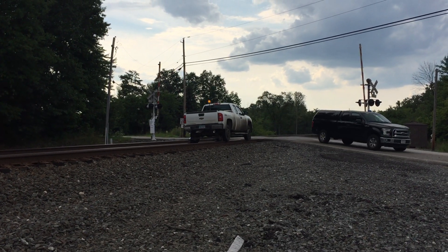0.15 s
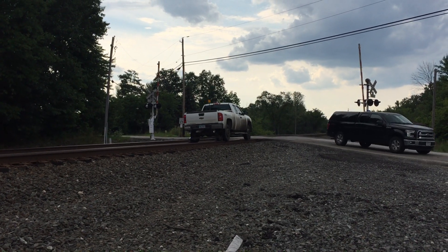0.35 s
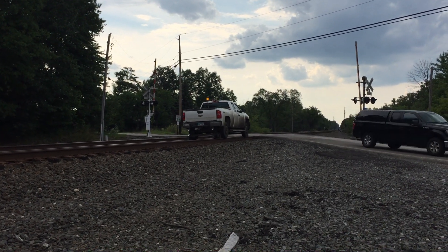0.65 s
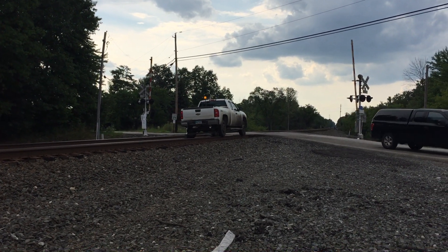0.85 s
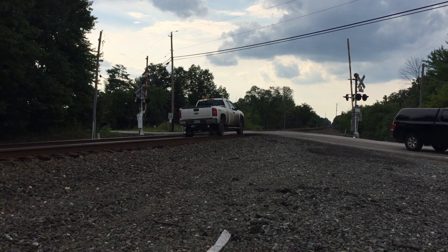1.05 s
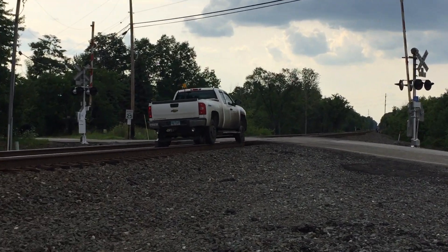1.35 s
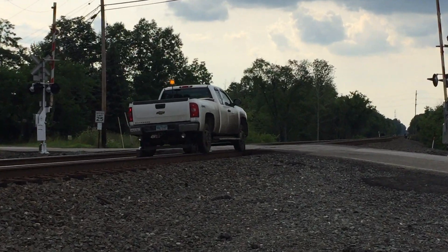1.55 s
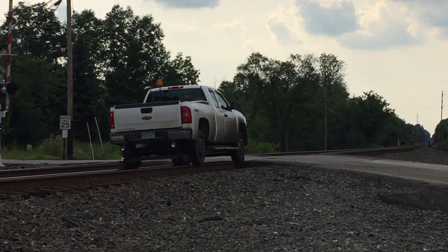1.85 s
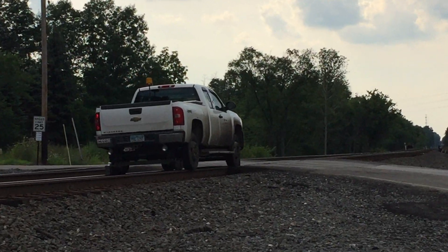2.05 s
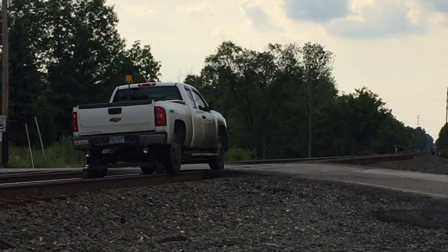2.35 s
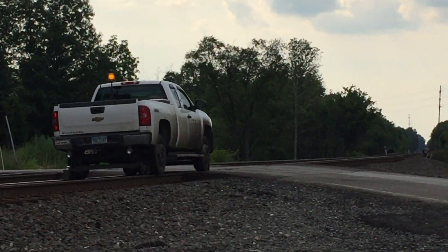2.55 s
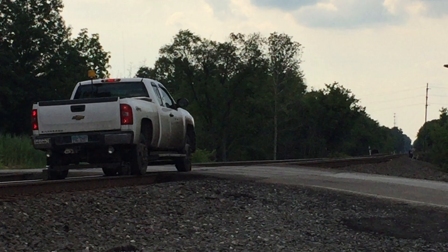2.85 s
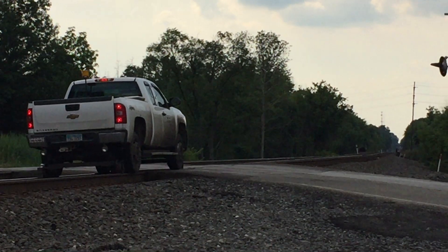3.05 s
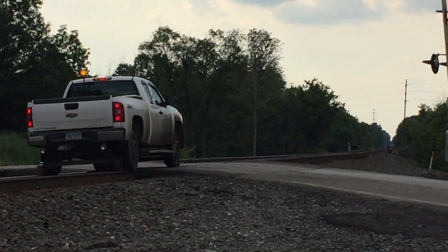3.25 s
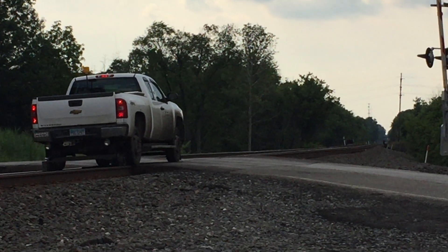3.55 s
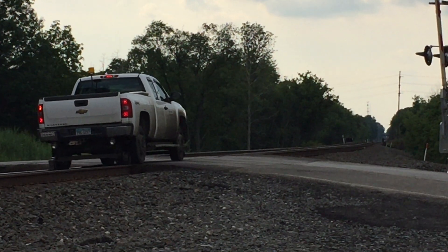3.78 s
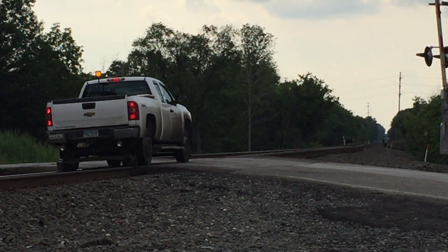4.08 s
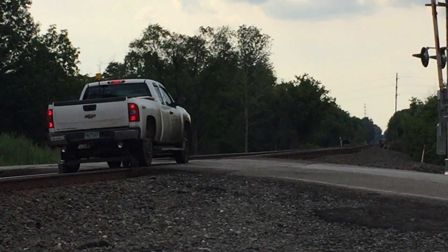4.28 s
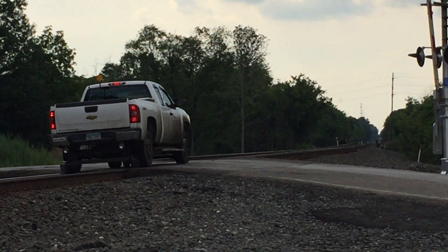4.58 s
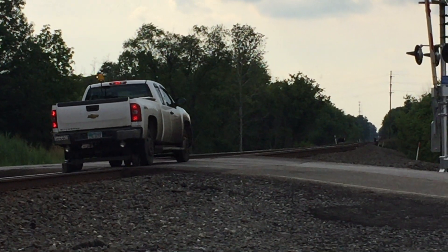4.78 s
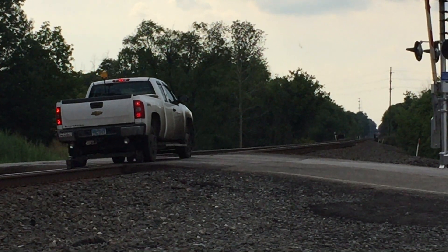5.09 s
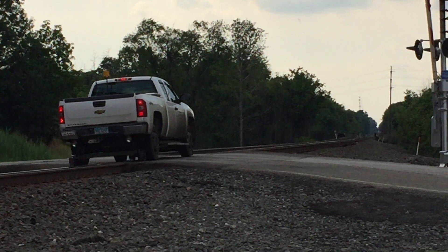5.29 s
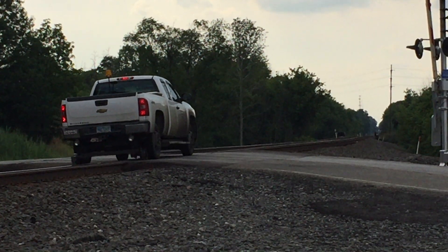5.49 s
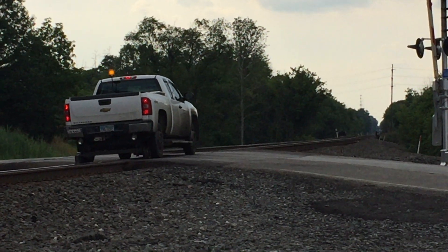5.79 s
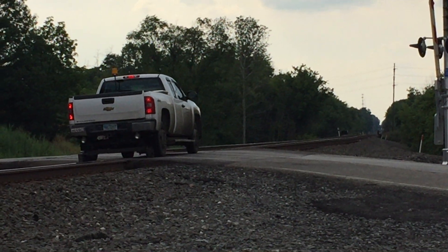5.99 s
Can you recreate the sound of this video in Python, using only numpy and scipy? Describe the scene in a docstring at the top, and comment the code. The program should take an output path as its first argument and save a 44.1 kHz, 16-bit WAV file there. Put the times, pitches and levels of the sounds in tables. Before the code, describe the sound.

Low throbbing engines and gravelly tyre hiss swell then fade outdoors, over a fast shrill insect trill, with squeaks, snaps and faint brake creaks.

```python
"""A pickup's exhaust leads: firing orders beat with other engine tones over throbbing low-band noise.
It creeps onto a railway crossing and brakes to a stop, while a second vehicle rolls off it and away.
Tyres are banded noise, brightest with the second vehicle near; brakes, pump and body panel add tones.
Dry squeaks, short bursts, chirps and sharp snaps, quicken into a chatter; the truck creaks.
An insect, one tone swept at each wing beat, ticks in the verge with a brief hush. Open air, mono."""
import sys
import numpy as np
from scipy import signal
from scipy.fft import rfft, irfft, next_fast_len
from scipy.io import wavfile
from scipy.ndimage import uniform_filter1d, map_coordinates

SR = 44100
rng = np.random.default_rng(int(sys.argv[2]) if len(sys.argv) > 2 else 0)


def transcribe(signal):
    """Save signal, clipped to [-1, 1], as a 16-bit WAV file at the path in sys.argv[1]."""
    frames = np.atleast_2d(signal).T
    limited = np.clip(frames, -1, 1)
    pcm = np.round(limited * 32767).astype(np.int16)
    wavfile.write(sys.argv[1], SR, pcm)


N = 270288  # samples

# Table levels are those before each layer's own trim, random wobble and filtering.
# the pickup's exhaust note: (time [s], firing rate [Hz], level [dB], octave level [dB])
EXHAUST_NOTE = [(0, 59.1, -54, -47), (0.25, 61.8, -47.5, -72), (0.6, 65.14, -42, -53),
                (1.1, 67, -44.5, -50.5), (1.3, 63.2, -68, -63), (1.5, 57.62, -45, -56.5),
                (1.95, 58.6, -42, -44.5), (2.5, 62.02, -39.5, -59.5), (3.3, 64.58, -47, -48),
                (4, 66.88, -42, -50), (5, 70, -43, -73), (5.55, 70.35, -51.5, -56.5),
                (6.13, 60.4, -51.5, -63)]
# third order against the first; it fades as the tailpipe turns away
THIRD_ORDER_DB, THIRD_FADE_DB_PER_S = -8, 3
# engine hum: (time [s], pitch [Hz], level [dB], octave level [dB])
ENGINE_HUM = [(1.3, 102.5, -62, -69), (1.8, 102.2, -52.5, -66), (2.3, 100.1, -60, -48),
              (3.3, 102.5, -51, -75), (4.4, 100.1, -86, -53), (4.9, 101.8, -81, -74),
              (5.3, 103.2, -58.5, -58.5), (5.7, 101.3, -56.5, -64), (6.13, 100.7, -56.5, -68)]
# a second exhaust note: (time [s], pitch [Hz], level [dB])
SECOND_EXHAUST = [(2.7, 50.13, -60), (3.0, 49.94, -52), (3.4, 54.55, -52), (3.9, 58.3, -53),
                  (4.2, 58.66, -51), (4.5, 59.57, -60), (4.9, 58.7, -47), (5.2, 59.8, -49.5),
                  (5.35, 60.4, -51)]
# an engine picks up: (time [s], pitch [Hz], level [dB])
ENGINE_PICKUP = [(0.1, 90.9, -62), (0.3, 96, -44), (0.5, 103.7, -43.5), (0.7, 119.5, -48),
                 (1.0, 130.1, -46.5), (1.3, 133.6, -67)]
# an engine eases off: (time [s], pitch [Hz], level [dB])
ENGINE_EASING = [(3.5, 111.9, -53), (3.9, 107, -52), (4.2, 100.6, -49), (4.5, 93.8, -51),
                 (4.8, 90.2, -56.5), (5.2, 88.7, -54)]
# the pickup settles to a tick-over: (time [s], level [dB])
TICKOVER_LEVEL = [(4, -75), (4.6, -59.5), (5.4, -61), (6.13, -61.5)]
# its orders: (multiple of half the easing engine's pitch, level [dB])
TICKOVER_PARTIALS = [(1, -2.5), (3, 0), (4, -6.5), (5, -2.5)]
# both vehicles: (time [s], exhaust rumble [dB], road roar [dB], tread howl [dB], tread rush [dB], hiss [dB])
VEHICLE_NOISE = [(0.0, -54, -75, -55, -66, -65.5), (0.08, -50, -59.5, -57.5, -60, -63.5),
                 (0.5, -48, -58, -54.5, -57.5, -55.5), (1.06, -45.5, -52.5, -54.5, -54, -51),
                 (1.3, -44.5, -56.5, -54, -54, -53.5), (1.92, -49, -57.5, -52, -57.5, -60.5),
                 (2.66, -46.5, -55, -51.5, -57, -60.5), (3.59, -53, -58.5, -55.5, -55, -67.5),
                 (3.81, -52, -57, -56.5, -56.5, -63.5), (5.09, -55, -66, -64, -60, -66.5),
                 (5.97, -56, -69, -69, -66, -72.5), (6.05, -58.5, -68, -68, -67, -74)]
# colour of the exhaust rumble: (frequency [Hz], level [dB])
RUMBLE_COLOUR = [(25, -53), (40, -28), (50, -4), (75, -4.5), (105, 0), (135, -4), (155, -4.5), (195, -0.5),
                 (220, -8), (250, -14), (320, -20), (500, -42), (1000, -83)]
# a body panel drones: (time [s], level [dB])
PANEL_DRONE = [(0, -58), (1.2, -84), (2, -59.5), (3.2, -64), (3.9, -64), (4.6, -64.5), (5.3, -66),
               (6.13, -77)]
# colour of that drone: (frequency [Hz], level [dB])
PANEL_COLOUR = [(270, 1), (310, -1), (335, 1.5), (390, -15.5)]
# the panel's own note: (time [s], pitch [Hz], level [dB])
PANEL_TONE = [(3.6, 334, -70), (3.85, 328, -62), (4.05, 327, -67), (4.3, 326, -61), (4.6, 322, -70),
              (4.95, 316, -65), (5.15, 312, -72), (5.35, 307, -65), (5.6, 300, -74)]
# colour of the road roar: (frequency [Hz], level [dB])
ROAR_COLOUR = [(150, -8), (260, -5.5), (400, 0.5), (520, -5.5), (650, -9), (1000, -30), (3000, -71)]
# colour of the tread howl: (frequency [Hz], level [dB])
HOWL_COLOUR = [(450, -15.5), (580, -2), (640, -1.5), (740, 2), (820, 0), (900, -3.5), (1020, -9.5),
               (1400, -13.5), (3000, -46)]
# colour of the tread rush: (frequency [Hz], level [dB])
TREAD_COLOUR = [(600, -31), (950, 1.5), (1180, 1.5), (1500, -1), (1900, -2.5), (2200, -7.5), (2700, -21),
                (5000, -27.5), (9000, -73)]
# the second vehicle's tyres sing: (time [s], level [dB])
TYRE_SING = [(0, -67), (.6, -62), (1.1, -65), (1.6, -85), (6.13, -100)]
# colour of that singing: (frequency [Hz], level [dB])
SING_COLOUR = [(1600, -13), (1850, -1), (1980, 2), (2200, -7)]
# bright hiss, close by: (frequency [Hz], level [dB])
NEAR_HISS = [(1500, 1.5), (2400, -7), (3200, 0), (3800, 0), (4350, 0.5), (4850, -10), (5500, -6.5),
             (6400, -11.5), (6700, -11), (7000, -9), (7600, -8), (9000, -10.5), (11000, -35)]
# duller hiss, farther off: (frequency [Hz], level [dB])
FAR_HISS = [(1500, -23), (2400, 13.5), (3000, 12), (3600, -9), (4400, -18), (5000, -22), (5600, -14),
            (7000, -2), (9000, -38), (11000, -62)]
# how near the tyres sound: (time [s], share of the bright hiss [0-1])
NEAR_SHARE = [(0, 0.6), (.7, 0.71), (1, 0.71), (1.5, 0.72), (2, 0.57), (2.6, 0.7), (3.3, 0.42), (4, 0.05),
              (6.13, 0.023)]
# fine treble of the tyres: (time [s], level [dB])
TYRE_TREBLE = [(0, -70), (.7, -61), (1.3, -63.5), (1.8, -61.5), (2.2, -69), (3.4, -68.5), (4.4, -73),
               (6.13, -72)]
# colour of that treble: (frequency [Hz], level [dB])
TREBLE_COLOUR = [(3000, 11), (6000, 0.5), (9000, 3), (10300, -3), (11500, -2), (13500, -4.5), (16000, -6)]
# rubber blocks slip, broadly lower as the wheels slow: (time [s], pitch [Hz], level [dB])
TREAD_SLIPS = [(0, 4400, -78), (.25, 4400, -70), (.37, 4380, -62), (.55, 4400, -66), (.7, 4400, -65),
               (.9, 4200, -55.5), (1.15, 4000, -54), (1.4, 3780, -59), (1.9, 4100, -64), (3.1, 3105, -70),
               (3.55, 2900, -65), (4.2, 2950, -67), (4.45, 3000, -70), (4.72, 3200, -64), (5, 3000, -73),
               (6.13, 2800, -84)]
# the insect's song: (time [s], reference pitch [Hz], level [dB])
INSECT_SONG = [(0, 8580, -56.5), (1.5, 8590, -55), (2.8, 8600, -55.8), (3.01, 8620, -54), (3.03, 8300, -78),
               (3.3, 8270, -69), (3.55, 8400, -58.5), (3.75, 8500, -58), (3.9, 8615, -55.7),
               (6.13, 8592, -55.7)]
# the insect's pace: (time [s], wing beats per second [Hz])
INSECT_PACE = [(0, 19.8), (.9, 19.7), (1.3, 19.2), (1.7, 19.75), (2.3, 19.42), (2.9, 19.67), (3.4, 21.05),
               (3.7, 20), (4.05, 19.1), (4.13, 15.7), (4.24, 20.05), (4.7, 19.65), (5.2, 19.25),
               (6.13, 19.6)]
FIRST_BEAT_S = .041
# one wing beat: (place in the beat [share], pitch shift [Hz], level [dB])
WING_BEAT = [(-.5, -400, -26), (-.33, -250, -18.5), (-.22, -280, -18), (-.135, -190, -5.5),
             (-.06, -80, -.5), (.01, 30, -.5), (.08, -100, -.5), (.13, -380, -4), (.18, -650, -18),
             (.25, -380, -14.5), (.36, -600, -19), (.5, -400, -26)]
# a dry sizzle between the squeaks: (time [s], level [dB])
SIZZLE_LEVEL = [(0, -88), (1, -63), (1.3, -60), (1.7, -64), (2.2, -60.5), (2.9, -67), (3.4, -68),
                (3.55, -76), (3.9, -72.5), (4.4, -74.5), (4.8, -77), (5.3, -79.5), (6.13, -85)]
# colour of the sizzle: (frequency [Hz], level [dB])
SIZZLE_COLOUR = [(4500, -3.5), (5000, -5), (5300, 1), (5900, -0.5), (6400, -0.5), (7100, -35)]
# the squeaks quicken: (time [s], squeaks per second [Hz])
SQUEAK_PACE = [(0, 8.93), (.35, 11.93), (.7, 18.56), (1.4, 33.67), (2, 41.02), (3.3, 46.78)]
FIRST_SQUEAK_S = .038
# strength of the squeaks: (time [s], level [dB])
SQUEAK_STRENGTH = [(0, -68), (.04, -63), (.14, -53), (.24, -50), (.32, -52), (.41, -50), (.55, -49),
                   (.66, -53), (.9, -55), (1.08, -61), (1.18, -52), (1.3, -54.5), (1.6, -59), (1.75, -55),
                   (1.8, -55), (1.85, -49), (1.99, -50.5), (2.06, -54), (2.25, -55), (2.36, -64),
                   (2.6, -78), (3.08, -76), (3.17, -67), (3.25, -71), (3.32, -60), (3.38, -58.5),
                   (3.42, -69), (3.49, -69), (3.53, -62.5), (3.63, -65.5), (3.69, -76), (3.87, -70),
                   (3.92, -78)]
SQUEAK_SCATTER_DB = 1.4
# colour of the rasps: (frequency [Hz], level [dB])
RASP_COLOUR = [(2500, -30), (3700, -10), (4200, -2), (4750, -3), (5200, 0), (5800, 0), (6400, -1.5),
               (7000, -5), (7600, -14), (9000, -20), (13000, -36)]
# a chirp falls from swing above to swing below its centre
CHIRP_HZ, CHIRP_SWING_HZ, CHIRP_FALL_S = 5330, 620, .0034
CHIRP_WIDTH_SCATTER = .22  # of the log of the width
# each stroke also squeals in a lower resonance: (time [s], pitch [Hz], level [dB])
LOW_RESONANCE = [(0, 4400, -68), (.4, 4400, -57), (.7, 4400, -54), (.85, 4280, -47.5), (1.15, 4150, -48),
                 (1.4, 3830, -50.5), (1.6, 3950, -56), (1.95, 4100, -53.5), (2.15, 4050, -58),
                 (2.4, 4000, -67), (3.9, 3100, -85)]
LOW_SQUEAK_WIDTH_S, LOW_SQUEAK_LAG_S = .004, .003
# sharp snaps among the dry squeaks: (time [s], pitch [Hz], level [dB])
SQUEAK_SNAPS = [(.723, 5700, -46), (.825, 4900, -44.5), (.906, 5100, -44), (.952, 4900, -47),
                (1.077, 4100, -44), (1.083, 3300, -45), (1.178, 5600, -47), (1.209, 5700, -44),
                (1.274, 6900, -51), (3.443, 3050, -55), (3.446, 4300, -59)]
SNAP_WIDTH_S = .0018
# a pump slows with the engine: (time [s], pitch [Hz], level [dB])
PUMP_WHINE = [(3.66, 1850, -82), (3.85, 1980, -80), (4.05, 1868, -78), (4.6, 1840, -72), (4.7, 1830, -61),
              (4.8, 1820, -59), (4.92, 1808, -73), (5.0, 1795, -62), (5.15, 1772, -59), (5.3, 1735, -69),
              (5.45, 1695, -67), (5.58, 1675, -80), (6.13, 1630, -73)]
# overtones of the whine: (start [s], end [s], multiple of the pitch, level [dB])
PUMP_OVERTONES = [(3.66, 3.85, 6, -79), (4.05, 4.6, 6, -86), (4.5, 4.95, 5, -80), (5.4, 6.2, 6, -82),
                  (5.38, 6.05, 7, -83)]
# the truck creaks as it stops: (time [s], pitch [Hz], level [dB])
STOP_CREAKS = [(3.82, 2906, -60), (4.125, 2850, -60), (4.17, 2950, -60), (4.235, 2850, -58),
               (4.28, 3120, -63), (4.585, 3353, -70), (4.647, 3060, -62), (4.685, 3240, -64),
               (4.747, 3200, -63), (4.785, 3150, -67), (4.828, 2702, -70), (4.859, 2950, -70),
               (4.902, 2880, -62), (4.943, 2900, -66), (4.98, 2800, -60), (5.024, 2988, -58.5),
               (5.108, 2950, -63.5), (5.234, 2850, -60), (5.386, 2803, -63.5), (5.435, 3010, -65)]
CREAK_WIDTH_S, CREAK_OCTAVE_DB, CREAK_TOP_HZ = .0065, -14, 6800
# a dry scrape rides on the creaks: (time [s], level [dB])
SCRAPE_LEVEL = [(3.8, -73), (4.55, -76), (4.68, -70), (4.85, -67), (5.03, -70), (5.25, -74), (5.45, -80)]
# colour of the scrape: (frequency [Hz], level [dB])
SCRAPE_COLOUR = [(3800, -12), (4900, 0), (6300, 1), (7200, -3), (8500, -15)]
# brakes sing: (start [s], end [s], pitch [Hz], level [dB], sag [Hz per s])
BRAKE_TONES = [(5.3, 6.2, 802, -68, 22), (5.67, 6.2, 588, -66, 12), (5.3, 5.55, 592, -72, 0),
               (4.42, 4.78, 648, -64, 0), (5.5, 6.2, 1180, -73, 24)]
# a thin squeal slides down as the truck stops: (time [s], pitch [Hz], level [dB])
STOP_SQUEAL = [(4.9, 4860, -95), (5.0, 4830, -84), (5.1, 4795, -80), (5.2, 4745, -72.5),
               (5.27, 4700, -73.5), (5.33, 4630, -90), (5.4, 4560, -85), (5.53, 4520, -82),
               (5.68, 4490, -85), (5.78, 4475, -95), (5.95, 4445, -82.5), (6.1, 4410, -92)]
BAND_LIMIT_HZ = 15762


def amp(db):
    """Decibels to gain."""
    return 10 ** (np.asarray(db) / 20)


def unit(x):
    """Scaled to rms 1."""
    return x / np.sqrt(np.mean(x ** 2) + 1e-20)


def clock():
    """The time of each sample, in seconds."""
    return np.arange(N) / SR


def curves(rows):
    """One value per sample for each column after the time."""
    times, *columns = np.transpose(rows)
    return [np.interp(clock(), times, column) for column in columns]


def wobble(rate):
    """A smooth random curve, rate knots a second."""
    knots = rng.standard_normal(int(N * rate / SR) + 4)
    return map_coordinates(knots, [clock() * rate])


def filtered(x, response):
    """x times a response of frequency."""
    size = next_fast_len(N + SR // 2)
    return irfft(rfft(x, size) * response(np.fft.rfftfreq(size, 1 / SR)), size)[:N]


def lowpass(x, corner_hz, power):
    """x with its treble rolled off; gain is one half at the corner."""
    return filtered(x, lambda hz: 1 / (1 + (hz / corner_hz) ** power))


def coloured(x, spectrum):
    """x with a (frequency [Hz], level [dB]) spectrum, at rms 1."""
    f, db = np.transpose(spectrum)
    # 60 dB down an octave beyond either end
    log_f = np.log(np.r_[f[0] / 2, f, f[-1] * 2])
    edged_db = np.r_[db[0] - 60, db, db[-1] - 60]
    return unit(filtered(x, lambda hz: amp(np.interp(np.log(hz + 1), log_f, edged_db))))


def rush(spectrum, patchy_db):
    """Noise of rms 1 with drifting patches of gain."""
    z = signal.stft(rng.standard_normal(N), nperseg=1024)[2]
    field = uniform_filter1d(rng.standard_normal(z.shape), size=4, axis=0)
    field = uniform_filter1d(field, size=14, axis=1)
    noise = signal.istft(z * amp(patchy_db * unit(field)), nperseg=1024)[1][:N]
    return coloured(noise, spectrum)


def phase(hz):
    """The running angle of a moving frequency, from a random start."""
    return 2 * np.pi * (np.cumsum(hz) / SR + rng.random())


def cycles(rate_rows, first_s):
    """Cycles done at a changing rate, counted from the first stroke."""
    done = np.cumsum(curves(rate_rows)[0]) / SR
    return done - np.interp(first_s, clock(), done)


def gate(start, end, fade):
    """Open between two times, with soft edges."""
    return np.clip((clock() - start) / fade + .5, 0, 1) * np.clip((end - clock()) / fade + .5, 0, 1)


def bell(t, width):
    """A Gaussian swell."""
    return np.exp(-.5 * (t / width) ** 2)


def note(rows, rough, order=1):
    """One order of a gliding tone whose level wanders by rough dB."""
    hz, *levels = curves(rows)
    gain = np.sqrt(2) * amp(levels[order - 1] + rough * wobble(25))
    return gain * np.sin(order * phase(hz)) * gate(rows[0][0], rows[-1][0], 0.037)


def exhaust_notes():
    """Each engine's pulses sound as low orders of its rate; close pitches beat."""
    firing = amp(-3.5) * note(EXHAUST_NOTE, rough=1.0) + amp(-1.0) * note(EXHAUST_NOTE, rough=2.9, order=2)
    firing_hz, firing_db, _ = curves(EXHAUST_NOTE)
    third_db = firing_db + THIRD_ORDER_DB - THIRD_FADE_DB_PER_S * clock() + 4.2 * wobble(8)
    firing = firing + amp(third_db) * np.sin(3 * phase(firing_hz))
    hum = amp(3.5) * note(ENGINE_HUM, rough=0.99) + amp(-4.0) * note(ENGINE_HUM, rough=0.5, order=2)
    second = amp(2.0) * note(SECOND_EXHAUST, rough=0.27)
    revs = note(ENGINE_PICKUP, rough=1.1) + amp(3.5) * note(ENGINE_EASING, rough=1.0)
    return firing + hum + second + revs


def exhaust_rumble():
    """Exhaust turbulence throbs with each firing."""
    throb = 1 + 0.19 * np.sin(phase(curves(EXHAUST_NOTE)[0]))
    rumble = unit(rush(RUMBLE_COLOUR, patchy_db=1.34) * throb)
    return amp(curves(VEHICLE_NOISE)[0] + 4) * rumble


def body_panel():
    """A panel resonates as a narrow noise drone with its own gliding note."""
    drone = amp(curves(PANEL_DRONE)[0]) * rush(PANEL_COLOUR, patchy_db=1.0)
    return drone + note(PANEL_TONE, rough=2.9)


def tick_over():
    """The orders of the easing engine stand out as it nears idle."""
    angle = phase(curves(ENGINE_EASING)[0] / 2 * (1 + .008 * wobble(12)))
    orders = sum(amp(db + 1.6 * wobble(9)) * np.sin(round(order) * angle) for order, db in TICKOVER_PARTIALS)
    return np.sqrt(2) * amp(curves(TICKOVER_LEVEL)[0]) * orders


def tyres():
    """Road roar, tread howl and rush; the hiss is brightest while the second vehicle is near."""
    _, roar_db, howl_db, tread_db, hiss_db = curves(VEHICLE_NOISE)
    near = np.clip(curves(NEAR_SHARE)[0], 0, 1)
    roar = amp(roar_db + 0.5) * rush(ROAR_COLOUR, patchy_db=3.0)
    howl = amp(howl_db + 0.38) * rush(HOWL_COLOUR, patchy_db=1.5)
    tread = amp(tread_db - 0.02) * rush(TREAD_COLOUR, patchy_db=2.0)
    sing = amp(curves(TYRE_SING)[0]) * rush(SING_COLOUR, patchy_db=3)
    near_hiss = amp(2.8) * np.sqrt(near) * rush(NEAR_HISS, patchy_db=2.8)
    far_hiss = amp(0.73) * np.sqrt(1 - near) * rush(FAR_HISS, patchy_db=3.2)
    flutter = amp(1.83 * wobble(130))  # a quick random flutter in the level of the hiss
    hiss = flutter * amp(hiss_db - 1.5) * (near_hiss + far_hiss)
    treble = amp(curves(TYRE_TREBLE)[0] - 1.5) * coloured(rng.standard_normal(N), TREBLE_COLOUR)
    return roar + howl + tread + sing + hiss + treble


def tread_squeaks(count=680):
    """Tread blocks let go at random, each with a tiny, ragged chirp."""
    s, hz, db = np.transpose(TREAD_SLIPS)
    t = np.arange(-SR // 100, SR // 100) / SR
    swell = bell(t, .0024)
    out = np.zeros(N + SR)
    # one slip at a random moment in each equal slot
    times = (np.arange(count) + rng.random(count)) * N / SR / count
    for when, (detune, size) in zip(times, rng.standard_normal((count, 2))):
        glide = 1 + .05 * detune - .04 * np.tanh(t / .004)
        pitch = np.interp(when, s, hz) * glide + 1300 * rng.standard_normal(len(t))
        gain = amp(np.interp(when, s, db) + 2 * size + 4)
        out[round(when * SR):][:len(t)] += gain * swell * np.sin(phase(pitch))
    return out[:N]


def ticking_insect():
    """Each wing beat draws scraper over file: pitch arches with its speed, the return scrapes unevenly."""
    beat = (cycles(INSECT_PACE, FIRST_BEAT_S) + .5) % 1 - .5
    top_hz, db = curves(INSECT_SONG)
    share, shift_hz, stroke_db = np.transpose(WING_BEAT)
    loose = np.clip(np.abs(beat) / .2, 0, 1) ** 2  # unsteadier away from mid-stroke
    jitter_hz = (45 + 70 * loose) * wobble(900) + 35 * wobble(60)
    hz = top_hz + np.interp(beat, share, shift_hz) + jitter_hz
    scrape_db = 1.7 * wobble(560) + .9 * wobble(22) + 3.5 * loose * wobble(90)
    level_db = db + np.interp(beat, share, stroke_db) + scrape_db
    song = np.sqrt(2) * amp(level_db) * np.sin(phase(hz))
    # stones and weeds scatter the call: 60 dB of decay in 0.1 s
    t = np.arange(SR // 8) / SR
    scatter = rng.standard_normal(len(t)) * amp(-60 * t / .1)
    echo = amp(-17) * signal.fftconvolve(song, scatter / np.linalg.norm(scatter))[:N]
    return amp(-.3) * (song + echo)


def sizzle():
    """A dry, flickering band of noise between the squeaks."""
    noise = unit(amp(2.4 * wobble(110)) * rush(SIZZLE_COLOUR, patchy_db=3.3))
    return lowpass(amp(curves(SIZZLE_LEVEL)[0]) * noise, 8000, 12)


def squeaks():
    """Slow strokes are toothy rasps; as they come faster each tightens into a short, ragged falling chirp."""
    done = cycles(SQUEAK_PACE, FIRST_SQUEAK_S)
    count = np.interp(SQUEAK_STRENGTH[-1][0], clock(), done)
    times = np.interp(np.arange(count), done, clock())
    levels = np.interp(times, *np.transpose(SQUEAK_STRENGTH))
    levels = levels + SQUEAK_SCATTER_DB * rng.standard_normal(len(times))
    gaps = np.gradient(times)
    widths = np.clip(.14 * gaps - .0015, .0019, .0075)
    tonal = np.clip(2.4 - gaps / .017, 0, .9)  # share of chirp against rasp
    detunes = rng.standard_normal(len(times))
    t = np.arange(-SR // 30, SR // 30) / SR
    low_hz, low_db = curves(LOW_RESONANCE)
    rasp, chirps = np.zeros(N + SR), np.zeros(N + SR)
    for s, db, width, share, detune in zip(times, levels, widths, tonal, detunes):
        start = max(0, round((s + t[0]) * SR))
        spread = np.exp(share * rng.normal(0, CHIRP_WIDTH_SCATTER))
        swell = amp(db + 3.5 * share) * bell(t, width * spread)
        fall = CHIRP_SWING_HZ * np.tanh(t / CHIRP_FALL_S)
        hz = CHIRP_HZ + 130 * detune - fall + 1200 * rng.standard_normal(len(t))
        rasp[start:][:len(t)] += np.sqrt(1 - share) * swell
        chirps[start:][:len(t)] += np.sqrt(2 * share) * swell * np.sin(phase(hz))
        # the lower resonance lags by a few milliseconds, unevenly
        glide = 1 + .025 * rng.standard_normal() - .05 * np.tanh(t / LOW_SQUEAK_WIDTH_S)
        low = low_hz[start] * glide + 1650 * rng.standard_normal(len(t))
        low_swell = bell(t - rng.normal(LOW_SQUEAK_LAG_S, LOW_SQUEAK_LAG_S), LOW_SQUEAK_WIDTH_S)
        chirps[start:][:len(t)] += np.sqrt(2) * amp(low_db[start]) * low_swell * np.sin(phase(low))
    teeth = coloured(rng.standard_normal(N) * amp(3 * wobble(900)), RASP_COLOUR)
    return lowpass(amp(.5) * (chirps[:N] + rasp[:N] * teeth), 8000, 12)


def snaps():
    """Sharp snaps among the dry squeaks: each is a few milliseconds of gritty ring."""
    t = np.arange(-SR // 100, SR // 100) / SR
    swell = bell(t, SNAP_WIDTH_S)
    out = np.zeros(N + SR)
    for s, hz, db in SQUEAK_SNAPS:
        ring = np.sin(phase(hz + 2200 * rng.standard_normal(len(t))))
        out[round((s + t[0]) * SR):][:len(t)] += amp(db) * swell * ring
    return out[:N]


def pump_whine():
    """A pump whines down as a fluttering tone, now and then with thin overtones."""
    hz, db = curves(PUMP_WHINE)
    angle = phase(hz + 5 * wobble(200))
    flutter = np.sin(phase(hz + 6.5 * wobble(110)))
    tops = sum(amp(top_db + 2 * wobble(30)) * gate(start, end, .12) * np.sin(order * angle)
               for start, end, order, top_db in PUMP_OVERTONES)
    opened = gate(PUMP_WHINE[0][0], PUMP_WHINE[-1][0], .04)
    whine = np.sqrt(2) * amp(db + 1.8 * wobble(60)) * flutter * opened
    return amp(-2) * whine + amp(-1.5) * tops


def creaks():
    """Each creak is a brief, roughened tone with a weaker octave and a dry scrape."""
    t = np.arange(-SR // 50, SR // 50) / SR
    swell = bell(t, CREAK_WIDTH_S)
    out, rub = np.zeros(N + SR), np.zeros(N + SR)
    for s, hz, db in STOP_CREAKS:
        start = round((s + t[0]) * SR)
        angle = phase(hz + 1400 * rng.standard_normal(len(t)))
        tone = np.sin(angle) + amp(CREAK_OCTAVE_DB) * np.sin(2 * angle)
        out[start:][:len(t)] += np.sqrt(2) * amp(db) * swell * tone
        rub[start:][:len(t)] += swell ** 2
    scrape = amp(curves(SCRAPE_LEVEL)[0]) * rub[:N] * coloured(rng.standard_normal(N), SCRAPE_COLOUR)
    return scrape + lowpass(out[:N], CREAK_TOP_HZ, 8)


def brakes():
    """The brakes sing in fits, unsteady tones of which some sag, with a thin sliding squeal."""
    singing = np.zeros(N)
    for start, end, hz, db, sag in BRAKE_TONES:
        pitch = hz - sag * (clock() - start) + 5 * wobble(40) + 4 * wobble(8)
        gain = np.sqrt(2) * amp(db + 4.2 * wobble(24)) * gate(start, end, .13)
        singing += gain * np.sin(phase(pitch))
    return amp(-2.5) * singing + note(STOP_SQUEAL, rough=1.5)


def scene():
    """Vehicles and an insect in the open air, one channel."""
    engines = exhaust_notes() + exhaust_rumble() + body_panel() + tick_over()
    wheels = tyres() + tread_squeaks()
    dry_squeaks = sizzle() + squeaks() + snaps()
    stopping = pump_whine() + creaks() + brakes()
    return (engines + wheels + ticking_insect() + dry_squeaks + stopping)[None]


def record(dry):
    """The camera's microphone track keeps nothing above its band limit."""
    return np.array([filtered(channel, lambda hz: hz < BAND_LIMIT_HZ) for channel in dry])


dry = scene()
out = record(dry)
transcribe(out)
```